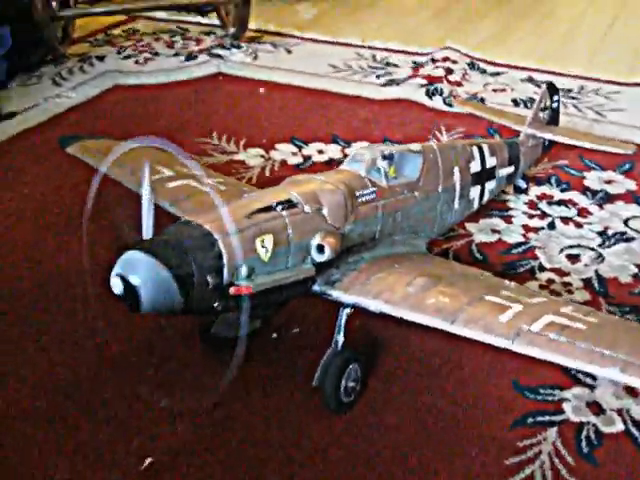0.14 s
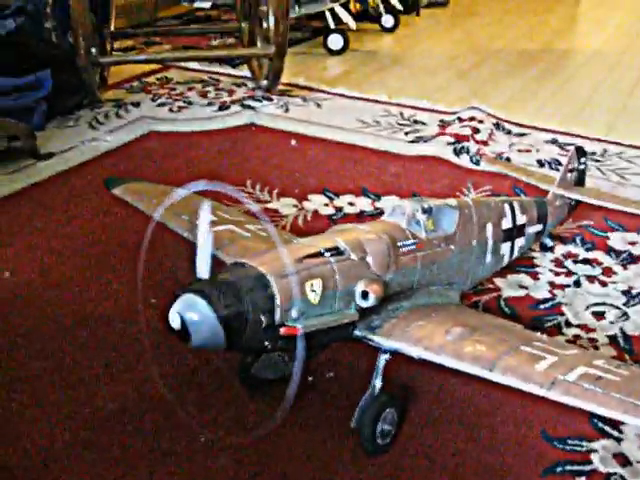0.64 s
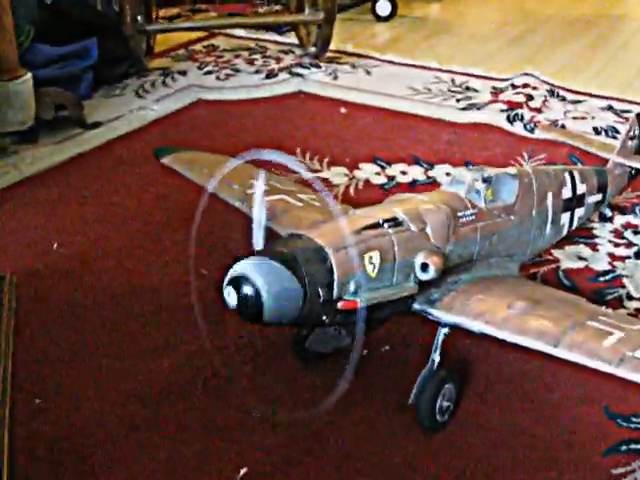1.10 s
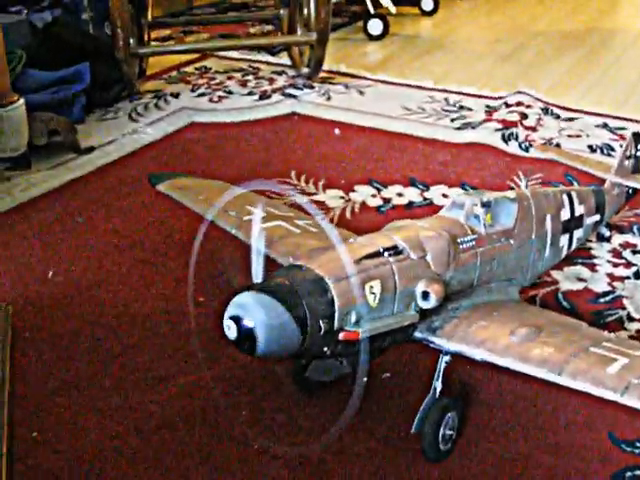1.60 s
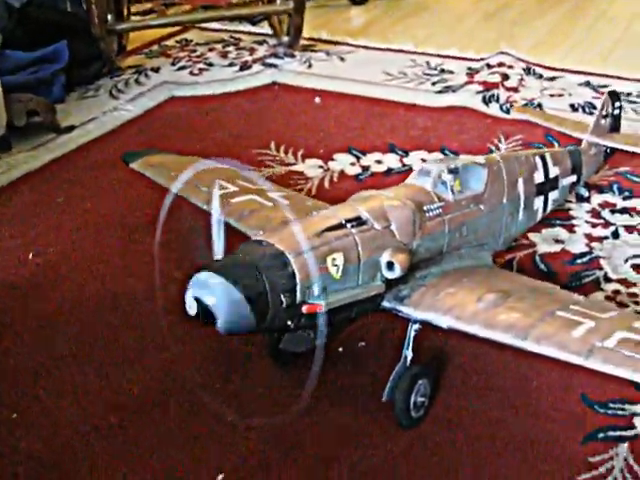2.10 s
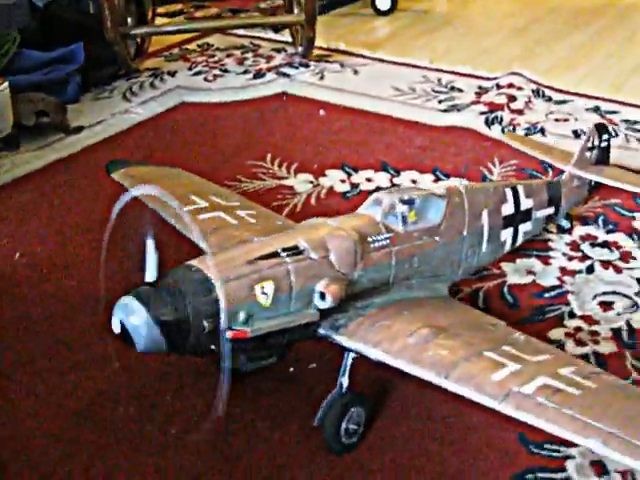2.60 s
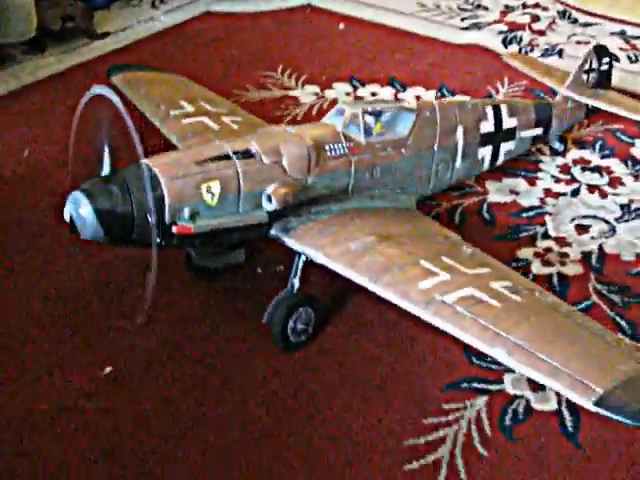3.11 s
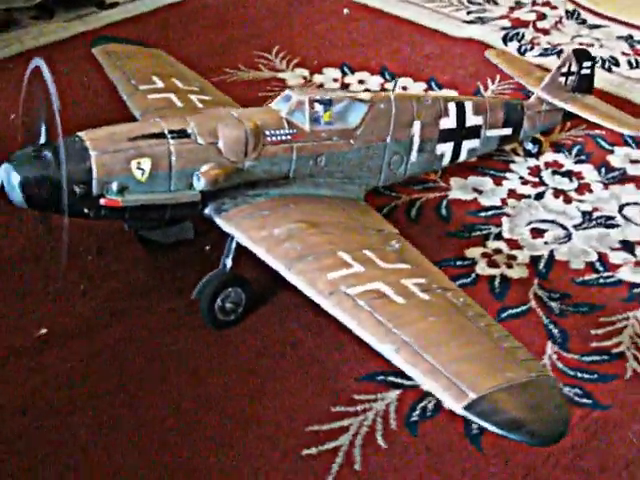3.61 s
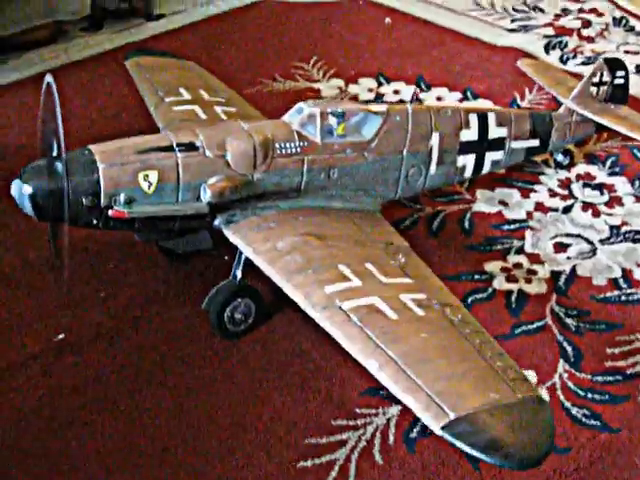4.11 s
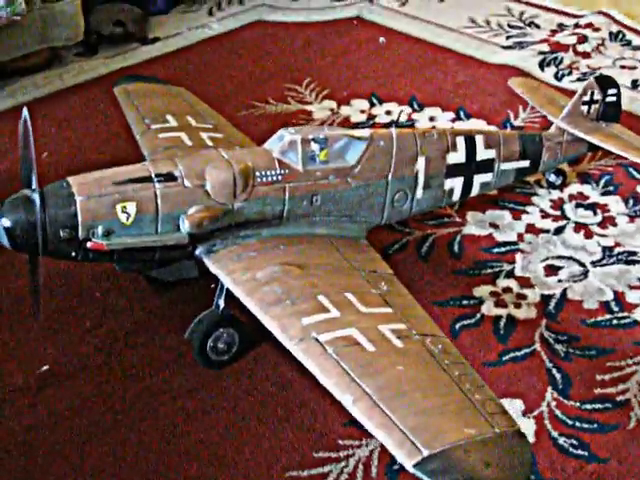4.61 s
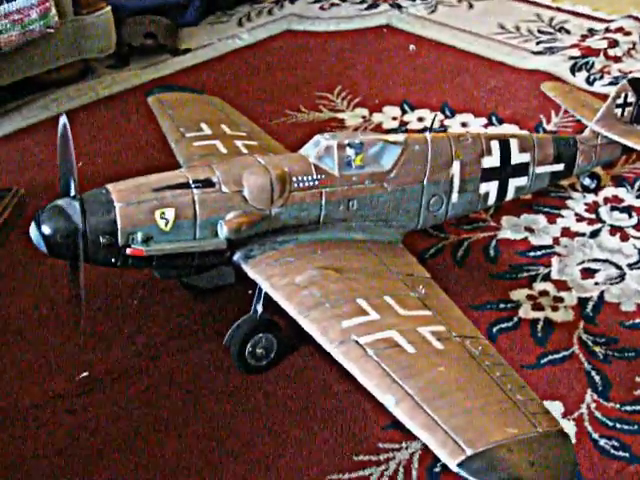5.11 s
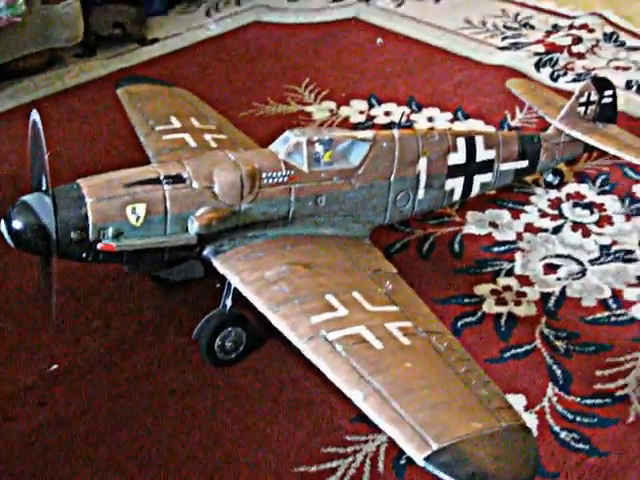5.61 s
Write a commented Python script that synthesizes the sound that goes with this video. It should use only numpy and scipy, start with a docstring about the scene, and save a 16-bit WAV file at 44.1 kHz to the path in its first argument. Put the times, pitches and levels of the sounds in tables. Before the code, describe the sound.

A small electric motor spins a model plane's propeller indoors, chattering grainily with hard, uneven knocks over thin singing tones and a wavering whistle.

```python
"""A grainy, uneven mechanical chatter with hard knocks, over thin singing lines and a wavering whistle.
A small electric motor idles a propeller on a hollow model aircraft standing on a carpet indoors: the shaft
chatters in its bearings and the shell rings with it, magnet poles sing, the speed controller whistles.
Noise and clicks through resonances make chatter and a close rustle; sines make lines; short rings make knocks.
The hand-held microphone circles between nose and flank, so the colours change; it samples at 12 kHz."""
import sys
import numpy as np
from scipy import signal
from scipy.fft import rfft, irfft, next_fast_len
from scipy.io import wavfile

SR = 44100
rng = np.random.default_rng(int(sys.argv[2]) if len(sys.argv) > 2 else 0)


def unload_audio(sound):
    """Save the sound as a 16-bit wav file, at the path given as the first command line argument."""
    columns = np.transpose(np.atleast_2d(sound))
    # keep every value between -1 and 1, then stretch to whole-number steps
    steps = np.round(np.clip(columns, -1, 1) * 32767)
    wavfile.write(sys.argv[1], SR, steps.astype(np.int16))


def boost_factor(decibels):
    """Convert a level in decibels to a linear amplitude factor."""
    exponent = np.asarray(decibels, float) / 20
    return 10 ** exponent


N = 252237


def rms_one(x):
    """Scale a signal to rms 1."""
    return x / np.sqrt(np.mean(x ** 2) + 1e-20)


def in_time(rows):
    """Draw each column of a table as an automation curve over every sample."""
    s, *columns = np.transpose(rows)
    return [np.interp(np.arange(N) / SR, s, c) for c in columns]


def phase_of(hz):
    """Running phase in radians of a changing rate."""
    return 2 * np.pi * np.cumsum(hz) / SR


def drift(corner_hz):
    """Random wavering of spread 1: noise smoothed by two equal poles, drawn at every 20th sample."""
    r = np.exp(-40 * np.pi * corner_hz / SR)
    noise = rng.standard_normal(N // 20 + 4002)
    slow = signal.lfilter([1], [1, -2 * r, r * r], noise)[4000:]
    return np.interp(np.arange(N) / 20, np.arange(len(slow)), rms_one(slow - slow.mean()))


def band(x, low_hz, high_hz):
    """Steep band-pass."""
    return signal.sosfilt(signal.butter(3, [low_hz, high_hz], "band", fs=SR, output="sos"), x)


def resonance(x, hz, width_hz):
    """Two-pole resonance of peak gain 1."""
    r = np.exp(-np.pi * width_hz / SR)
    gain = (1 - r * r) / 2
    return signal.lfilter([gain, 0, -gain], [1, -2 * r * np.cos(2 * np.pi * hz / SR), r * r], x)


def grains(per_s, spread_db):
    """Random clicks of uneven size and either sign, rms 1."""
    sizes = boost_factor(spread_db * np.minimum(rng.exponential(1, N), 3)) * rng.choice([-1, 1], N)
    return rms_one(sizes * (rng.random(N) < per_s / SR))


def burst(s, db, hz, rise_s, fall_s):
    """A short ring with a rounded swell and decay, peaking just after s."""
    t = np.arange(-.01, .03, 1 / SR)
    shape = np.exp(-(t / np.where(t < 0, rise_s, fall_s)) ** 2)
    out = np.zeros(N + len(t))
    at = round((s + rise_s + t[0]) * SR)
    out[at:at + len(t)] = boost_factor(db) * shape * np.cos(2 * np.pi * hz * t)
    return out[:N]


# where the microphone stands: (t/s, position from 0 at the nose to 1 at the flank)
BEARING = [(0, 0.15), (1.3, 0.1), (2.9, 0), (3.7, 0.9), (4.5, 1), (5.72, 0.9)]


def microphone_bearing():
    """The path of the hand-held microphone around the aircraft, 0 at the nose to 1 at the flank."""
    return in_time(BEARING)[0]


def room(x, places):
    """Reflections as dying noise; the tail cross-fades from place to place as the microphone moves."""
    t60_s = 0.28
    t = np.arange(int(.4 * SR)) / SR
    position, out = np.linspace(0, places - 1, N), 0
    for place in range(places):
        tail = rng.standard_normal(len(t)) * boost_factor(-60 * t / t60_s) * (t > .004)
        tail = tail / np.sqrt(np.sum(tail ** 2))
        near = np.cos(np.pi / 2 * np.clip(position - place, -1, 1))
        out = out + near * signal.fftconvolve(x, tail)[:N]
    return out


# steady tone: (f/Hz, rms level/dB)
LOW_HUM = (107.8, -65.5)


def low_hum():
    """A low steady sine."""
    hz, db = LOW_HUM
    return np.sqrt(2) * boost_factor(db) * np.sin(2 * np.pi * hz * np.arange(N) / SR)


# low bumps: two early thumps, then mostly small bumps of the overloaded input at loud bursts:
# (t/s, peak level/dB, direction +1 up or -1 down)
LOW_BUMPS = [(0.046, -29, -1), (.176, -35, -1), (.376, -36, 1), (0.507, -35, 1), (.822, -38, 1),
             (.939, -40, 1), (1.985, -41, -1), (2.045, -39, 1), (2.265, -40, 1), (2.439, -40, 1),
             (2.718, -41, -1)]
# one dull tap: (t/s, peak level/dB, f/Hz)
TAP = (3.5872, -14, 640)


def low_bumps_and_tap():
    """Each low bump is one short swing up or down; the tap is one short dull ring."""
    bumps = sum(np.sign(way) * burst(s, db, 25, 0.00046, 0.0024) for s, db, way in LOW_BUMPS)
    return bumps + burst(*TAP, .0004, .0013)


# treble resonances of the rustle: (f/Hz, width/Hz, level/dB relative)
RUSTLE_MODES = [(4510, 420, 4.5), (4796, 240, 4), (5485, 450, -0.5), (5970, 810, -12)]


def rustle_rings(drive):
    """Each broad treble resonance answers the same drive, in alternating sign."""
    out = 0
    for k, (hz, width, db) in enumerate(RUSTLE_MODES):
        out = out + (-1) ** k * boost_factor(db) * resonance(resonance(drive, hz, 1300), hz, width)
    return out


# swell of the grainy part: (t/s, level/dB against its rms)
RUSTLE = [(1.05, -58), (1.15, -46), (1.22, -41), (1.3, -40), (1.4, -36.5), (1.5, -41.5), (1.6, -40.5),
          (1.76, -36.5), (1.88, -40), (1.98, -40.5), (2.08, -48), (2.2, -57)]
# sharper ticks within the rustle: (t/s, peak level/dB)
CRACKLES = [(1.2984, -31), (1.398, -29), (1.457, -29), (1.748, -28), (1.8344, -30), (1.9165, -30)]


def rustle():
    """A bright rustle close by: clumped grains and a few sharper ticks ring broad treble resonances."""
    s, db = np.transpose(CRACKLES)
    peak_of_one = np.abs(rustle_rings(np.eye(1, 400)[0])).max()
    ticks = np.zeros(N) + 1e-18
    ticks[(s * SR).astype(int)] = boost_factor(db) / peak_of_one
    clumped = grains(3000, 3.5) * boost_factor(2.0 * drift(50.0))
    return boost_factor(in_time(RUSTLE)[0]) * rms_one(rustle_rings(clumped)) + rustle_rings(ticks)


def singing_line(phase, nose_db, flank_db):
    """One sine whose level (dB rms) follows the microphone, with its own slow fade and quick flutter."""
    level_db = nose_db + (flank_db - nose_db) * microphone_bearing()
    level_db = level_db + 0.7 * drift(1.2) + 1.7 * drift(11.0)
    return np.sqrt(2) * boost_factor(level_db) * np.sin(phase + rng.uniform(0, 2 * np.pi))


# whistle level before flutter: (t/s, rms level/dB)
WHISTLE = [(0, -55), (.4, -47.5), (.85, -60), (1.5, -46), (2.1, -42.5), (2.4, -54), (3.25, -51),
           (3.5, -43.5), (3.75, -48.5), (3.95, -42), (4.2, -49.5), (5.25, -45.5), (5.72, -55)]
# its second harmonic before flutter: (t/s, rms level/dB)
OCTAVE = [(0, -60), (.9, -58), (1.5, -52), (3.2, -53), (3.7, -64), (4.2, -56), (4.7, -52), (5.72, -52)]
# distance of each side line above the whistle: (cycles per shaft turn)
SIDE_TURNS = (63, 84, 105, 126, 147, 168, 189)
# side line levels before wavering: (rms level/dB at the nose, rms level/dB at the flank)
SIDE_DB_AT = [(-63, -65), (-70, -61), (-57, -60), (-61, -72), (-57.5, -55), (-60, -62), (-56, -66)]


def whistle(turn):
    """Switching whistle of the speed controller, its second harmonic, and side lines spaced by the shaft."""
    switch = phase_of(4166.0 + .7 * drift(2.0))   # Hz
    flutter_db = 1.7
    tone = boost_factor(in_time(WHISTLE)[0] + flutter_db * drift(3.6)) * np.sin(switch)
    octave = boost_factor(in_time(OCTAVE)[0] + flutter_db * drift(9.0)) * np.sin(2 * switch)
    sides = sum(singing_line(switch + k * turn, *dbs) for k, dbs in zip(SIDE_TURNS, SIDE_DB_AT))
    return np.sqrt(2) * (tone + octave) + sides


# lines that keep one level all round: (cycles per shaft turn)
TURN_ORDERS = (3, 12, 17, 18, 21, 23, 25, 28, 126, 63, 231)
# their levels before wavering, the same all round: (rms level/dB)
ORDER_DB = [-80, -63, -61, -61.5, -58.5, -54, -53, -52.5, -55, -44, -64]
# lines whose level changes between nose and flank: (cycles per shaft turn)
DIRECTED_TURNS = (9, 13, 14, 24, 42, 48, 49, 147, 168, 189)
# their levels before wavering: (rms level/dB at the nose, rms level/dB at the flank)
DIRECTED_DB_AT = [(-79, -63.5), (-57, -51), (-53.5, -59.5), (-46, -52.5), (-47.5, -41), (-44, -49),
                  (-39, -51.5), (-52, -52), (-51, -60), (-55, -50)]


def pole_lines(turn):
    """Magnet poles sing sines at whole multiples of the shaft rate."""
    all_round = sum(singing_line(k * turn, db, db) for k, db in zip(TURN_ORDERS, ORDER_DB))
    return all_round + sum(singing_line(k * turn, *dbs) for k, dbs in zip(DIRECTED_TURNS, DIRECTED_DB_AT))


# shaft speed before a tiny random drift: (t/s, turns per s)
SHAFT = [(0, 19.70), (.25, 19.74), (.72, 19.802), (1.15, 19.837), (1.8, 19.837), (2.9, 19.82),
         (3.5, 19.845), (4.0, 19.868), (4.95, 19.84), (5.72, 19.815)]


def whine():
    """Pole lines and the whistle's side lines follow one turning shaft; the whistle keeps its own pitch."""
    turn = phase_of(in_time(SHAFT)[0] * (1 + .0002 * drift(3.0)))
    return pole_lines(turn) + whistle(turn)


# harder knocks of the shaft, plus at 3.5874 s the higher ring of the dull tap: (onset t/s, level/dB 3 dB above
# the played peak, f/Hz)
KNOCKS = [(0.0246, -11, 1580), (0.0687, -17, 1600), (0.1333, -10.5, 1210), (0.154, -12, 1310),
          (0.1988, -9, 1600), (0.2314, -16, 1520), (0.265, -8.5, 1570), (0.2843, -9, 1430),
          (0.3156, -10.5, 1670), (0.3265, -8, 1490), (0.438, -11, 1650), (0.4885, -12, 1810),
          (0.5048, -13, 1220), (0.568, -13, 1060), (0.5921, -10.5, 1670), (0.6362, -5, 1280),
          (0.66, -13, 1620), (0.6953, -11.5, 1540), (0.7733, -11.5, 1400), (0.8192, -7, 1290),
          (0.8419, -14, 1320), (0.8636, -8, 1250), (0.8888, -8, 1300), (0.9358, -9, 1410),
          (0.9835, -4.5, 1074), (1.0191, -16, 990), (1.033, -10.5, 1130), (1.0798, -16, 1450),
          (1.1533, -12.5, 1250), (1.2025, -17, 1080), (1.3548, -7.5, 1090), (1.5663, -17, 1400),
          (1.5772, -14, 1200), (1.7998, -15, 1350), (1.8741, -13, 1550), (2.0747, -15, 1500),
          (2.0989, -10, 1592), (2.1989, -21, 1820), (2.2198, -8.5, 1650), (2.2612, -7.5, 1680),
          (2.2842, -15, 1810), (2.4596, -15, 1570), (2.4953, -15, 1100), (2.53, -15, 1210),
          (2.595, -8, 1470), (2.661, -11, 1551), (2.6844, -8, 1410), (2.6972, -8, 1580),
          (2.7706, -12, 1070), (2.805, -12, 1600), (2.815, -9.5, 1490), (2.8583, -13, 1459),
          (2.8782, -11, 1610), (2.9403, -7.5, 1670), (3.0341, -15, 1247), (3.1136, -10.5, 1713),
          (3.2763, -11, 1380), (3.5874, -13, 1266), (3.925, -9, 1486), (4.132, -14, 1081),
          (4.2093, -7, 1221), (4.2377, -10.5, 1378), (4.3486, -16, 1638), (4.509, -10.5, 1354),
          (4.5519, -18, 1660), (4.6341, -12.5, 1398), (4.6803, -22, 1720), (4.6875, -13.5, 1620),
          (4.7594, -16.5, 1120), (4.8041, -15, 1580), (4.9307, -12.5, 1653), (5.231, -14, 1740)]


def knocks():
    """Hard blows of the shaft ring in the shell for a few cycles; one row adds a higher ring to the dull tap."""
    return sum(burst(s, db - 3.0, hz, 0.0007, 0.0036) for s, db, hz in KNOCKS)


# pitches at which the shell answers a landing: (f/Hz)
LANDING_HZ = (1080, 1250, 1420, 1560, 1700)


def landing_blows(bounce, level, lean):
    """One uneven blow per shaft bounce, each striking one spot of the shell with its own pitch."""
    landed = np.diff(np.floor(bounce / (2 * np.pi)), prepend=0) > 0
    for s, _, _ in KNOCKS:   # a hard knock takes the place of a landing
        landed[round((s - .007) * SR):round((s + .007) * SR)] = False
    sizes_db = rng.uniform(-7.0, 2.0, N) + drift(18.0)
    landings = rms_one(landed * boost_factor(sizes_db) * rng.choice([-1, 1], N))
    spot = rng.integers(0, len(LANDING_HZ), N)
    out = 0
    for k, hz in enumerate(LANDING_HZ):
        ring = resonance(resonance(landings * (spot == k), hz, 700), hz, 480)
        out = out + boost_factor(level + lean * (.5 - k / (len(LANDING_HZ) - 1))) * ring
    return rms_one(out)


# colour of the chatter: (f/Hz, level/dB per Hz, relative)
SHELL = [(20, -27), (140, -23), (300, -19), (620, -9.5), (890, -7), (970, -3), (1700, 4), (2100, -8.5),
         (3200, -11), (4900, -22.5), (5150, -30.5), (5900, -34.5), (6600, -42), (8200, -58.5)]
# pitches at which the boom, chatter and upper-hiss changes hold fully: (f/Hz)
HEARD_HZ = (640, 1100, 1680, 2900, 3800, 4700)


def shaft_and_blades(crowding, heard, touches_per_s=220, spread_db=2.5, touch_share=0.38):
    """Blade hiss in quarter-octave bands; around 1.4 kHz the shell rings with separate shaft touches."""
    hiss = rng.standard_normal((2, N))   # neighbouring bands take turns
    edges = 20 * 2 ** np.arange(0, 8.8, 1 / 4)
    together = drift(25.0)   # flicker common to all bands
    shell_hz, shell_db = np.transpose(SHELL)
    heard_at = np.log([250, *HEARD_HZ, 5800])   # the changes fade out towards both ends
    out = 0
    for k, (low, high) in enumerate(zip(edges, edges[1:])):
        pitch = np.log(np.sqrt(low * high))
        share = touch_share * np.exp(-((pitch - np.log(1350)) / .5) ** 2)
        drive = np.sqrt(1 - share) * hiss[k % 2]
        if 500 < low < 2100:   # separate touches in every band, so each rings at one pitch
            drive = drive + np.sqrt(share) * 1.15 * grains(touches_per_s * crowding, spread_db)
        weights = [np.interp(pitch, heard_at, row) for row in np.eye(8)[1:7]]
        level_db = np.interp(pitch, np.log(shell_hz), shell_db) + np.dot(weights, heard)
        level_db = level_db + .5 * (together + drift(26.0)) + .7 * drift(2.13)
        out = out + boost_factor(level_db) * band(drive, low, high)
    return rms_one(out)


# resonances of the hollow shell: (f/Hz, width/Hz, gain level/dB at the nose, gain level/dB at the flank)
SHELL_MODES = [(477, 130, 3, 3), (573, 28, 4.5, 9), (633, 83, -14.5, -3), (678.4, 40, 8, 10.5),
               (708, 32, 3.5, -2.5), (868, 77, -4.5, -5), (1666, 140, -2, -10.5), (1085, 70, 1.5, 8),
               (1660, 55, 1.5, 7), (1935, 50, 4, 5), (2207, 45, 0, 4), (2326, 50, 4, 0), (2455, 45, 1, 5),
               (2790, 60, 3, 3), (2990, 45, 4, 4), (3370, 50, 4, 0), (3670, 70, 4, 3), (4530, 81, 6, 6)]


def shell_ring(x):
    """Each shell mode lifts or dips its own pitch, by an amount that follows the microphone."""
    bearing = microphone_bearing()
    out = x
    for hz, width, nose_db, flank_db in SHELL_MODES:
        gain = boost_factor(nose_db + (flank_db - nose_db) * bearing)
        out = out + (gain - 1) * resonance(x, hz, width)
    return out


# chatter near 1.4 kHz as the microphone sways: (t/s, level/dB change, lean level/dB of 1.1 over 1.7 kHz)
CHATTER = [(0, 3, -3), (.5, 4.5, 3.5), (.95, 3, 5.5), (1.65, -1.5, 4), (2.05, 3, -2), (2.4, 1.5, 4),
           (2.75, 4.5, 1.5), (3.45, -3, -4), (3.75, 0.5, 2), (3.95, -3, 0.5), (4.2, 0.5, 2),
           (4.45, -2, -1.5), (4.7, -3.5, -6), (4.92, -2.5, -0.5), (5.1, -5, -6), (5.25, -5, -10),
           (5.42, -6.5, -6.5), (5.52, -4.5, 2), (5.62, 0, -3), (5.72, -2.5, -6)]
# upper hiss: (t/s, level/dB change at 2.9 kHz, level/dB change at 3.8 kHz, level/dB change at 4.7 kHz)
UPPER = [(0, 11, 2.5, 4), (.3, 2, 1, -2), (.65, 1, 1.5, -10), (.95, -2, -0.5, -3.5), (1.4, 3, 2.5, 3.5),
         (1.8, 2, 4.5, 5), (2.2, 7, -4.5, -6), (2.6, -0.5, 1.5, -1), (3, 0, -2.5, 2), (3.3, 0.5, -0.5, 4.5),
         (3.8, 1, -0.5, 0.5), (4.3, -3, -1, 5), (4.75, -2, 0.5, -4.5), (5.3, 2.5, 0, 6), (5.72, -2, 1, 1.5)]
# how fast the loose shaft bounces, before random drift: (t/s, bounces per s)
BOUNCE = [(0, 100), (.6, 86.7), (1.3, 82), (1.8, 79), (2.1, 96), (2.7, 89), (3.3, 104), (4.1, 98),
          (4.8, 89.3), (5.72, 89)]


def chatter(bounce_db=7.0, landing_db=-5, room_db=-10):
    """The loose shaft bounces in its bearings: touches, landings and blade hiss ring the shell and room."""
    level, lean = in_time(CHATTER)
    # the shell near 640 Hz is louder from the flank, and wavers
    boom = 3 * (microphone_bearing() - .5) + 1.2 * drift(5.0)
    heard = np.array([boom, level + lean / 2, level - lean / 2, *in_time(UPPER)])
    bounce = phase_of(in_time(BOUNCE)[0] * (1 + .04 * drift(4.0) + .04 * drift(60.0)))
    # touches crowd at each bounce, strong and weak in turn
    crowding = boost_factor(bounce_db * (np.cos(bounce) + .5 * np.cos(bounce / 2)))
    blows = boost_factor(landing_db) * landing_blows(bounce, level, lean)
    rung = shell_ring(shaft_and_blades(crowding, heard) + blows)
    return boost_factor(-24.0) * rms_one(rung + boost_factor(room_db) * room(rung, places=4))


def scene():
    """All sources meet at one microphone."""
    return (low_hum() + low_bumps_and_tap() + rustle() + whine() + knocks() + chatter())[None]


def overloaded(dry, low_top=0.23, high_top=0.24):
    """The input stage overloads sooner on negative peaks, so loud bursts leave low bumps."""
    top = np.where(dry < 0, low_top, high_top)
    bent = dry / (1 + (dry / top) ** 4) ** (1 / 4)
    # the overload is sluggish and adds little treble
    return dry + signal.sosfilt(signal.butter(2, 3600, fs=SR, output="sos"), bent - dry)


def sampled(x):
    """Sampling mirrors treble about half the sampling rate; gentle smoothing lets part of it through."""
    sampling_hz, slope_hz = 12000, 1670   # slope_hz: half width of the smoothing filter's slope
    mirrored = x * (1 + 2 * np.cos(2 * np.pi * sampling_hz * np.arange(N) / SR))
    size = next_fast_len(N)
    hz = np.arange(size // 2 + 1) * SR / size
    slope = np.clip((hz - sampling_hz / 2) / slope_hz, -1, 1)
    return irfft(rfft(mirrored, size) * (1 - np.sin(np.pi / 2 * slope)) / 2, size)[:, :N]


def top_cut(x):
    """Nothing passes above the cut-off."""
    return signal.sosfilt(signal.butter(12, 7690, fs=SR, output="sos"), x)


def record(dry):
    """The input stage overloads, slow sampling ends the band, and a small constant offset is added."""
    mix = sampled(overloaded(dry)) - .0019
    return top_cut(mix)


dry = scene()
out = record(dry)
unload_audio(out)
```